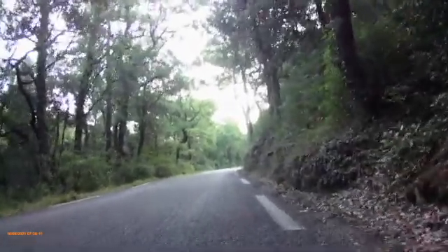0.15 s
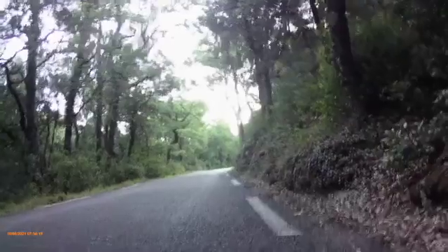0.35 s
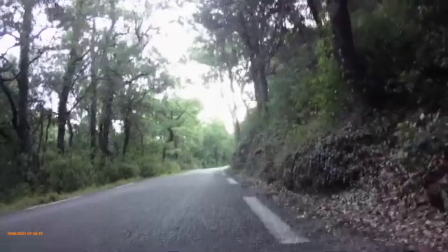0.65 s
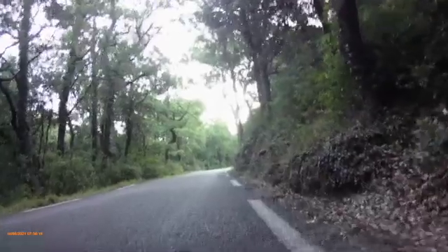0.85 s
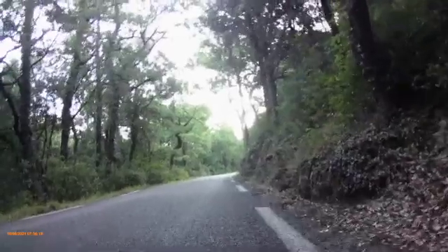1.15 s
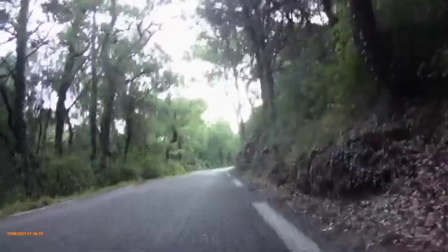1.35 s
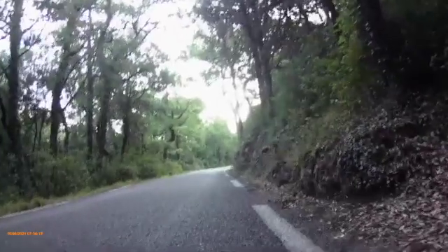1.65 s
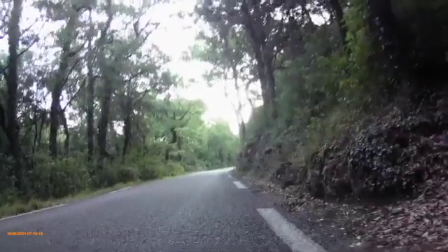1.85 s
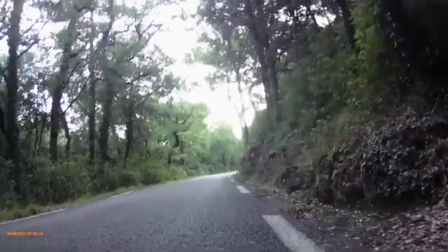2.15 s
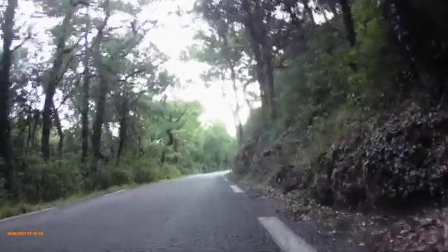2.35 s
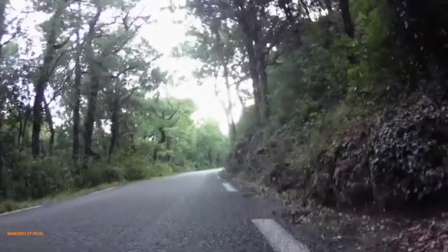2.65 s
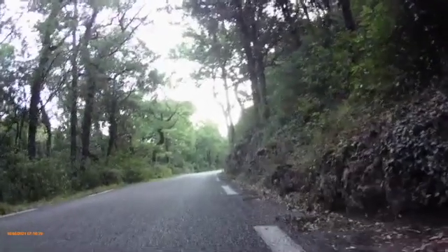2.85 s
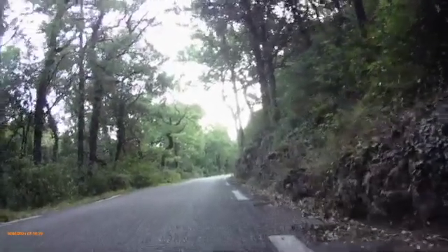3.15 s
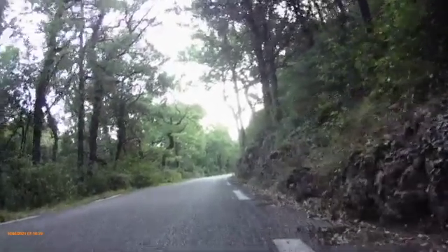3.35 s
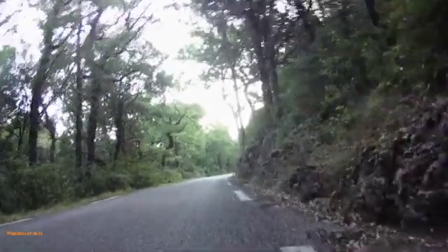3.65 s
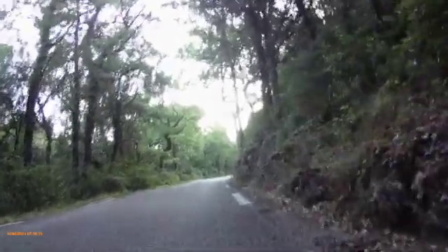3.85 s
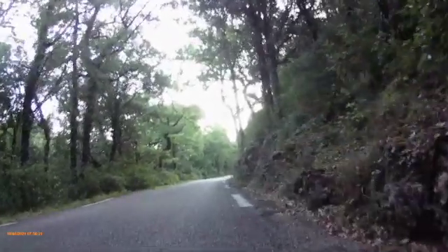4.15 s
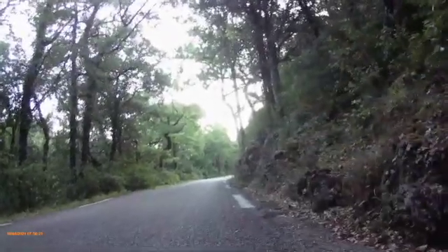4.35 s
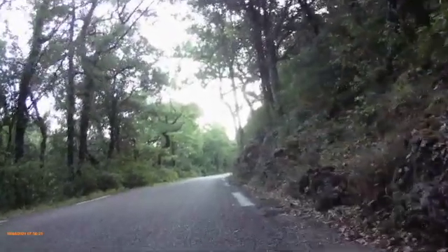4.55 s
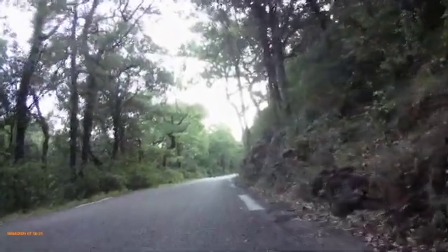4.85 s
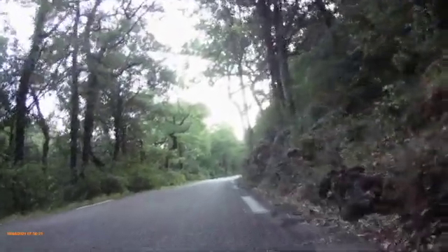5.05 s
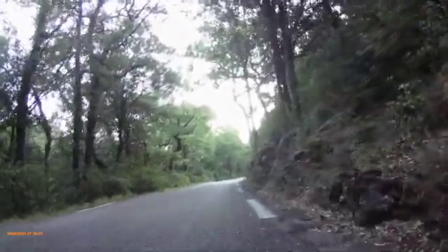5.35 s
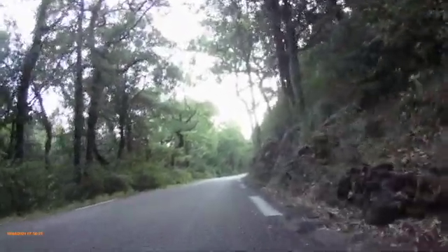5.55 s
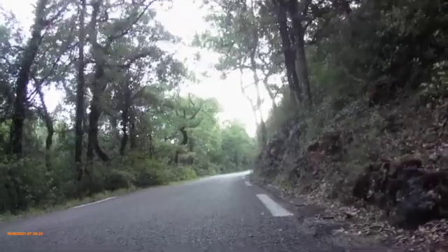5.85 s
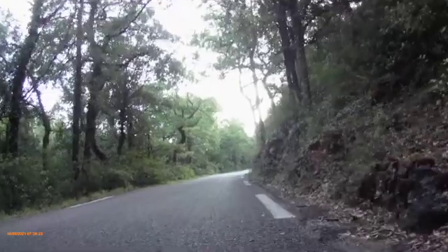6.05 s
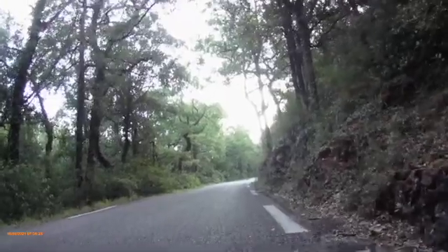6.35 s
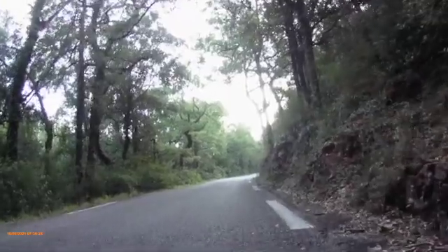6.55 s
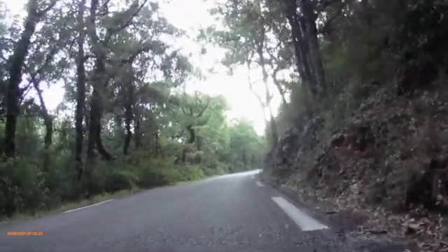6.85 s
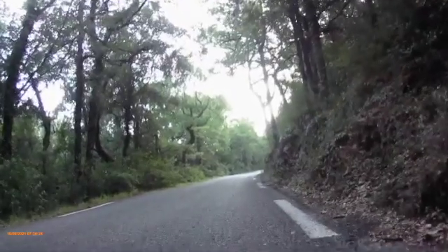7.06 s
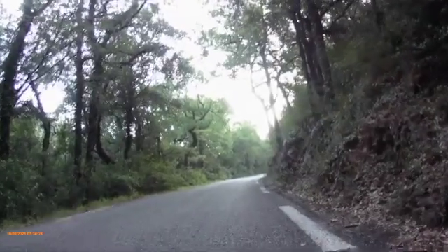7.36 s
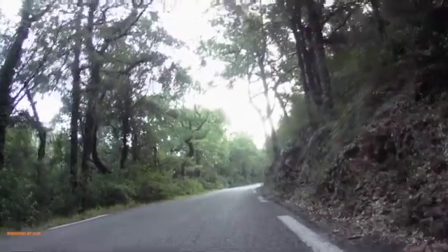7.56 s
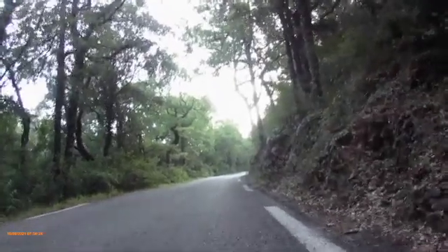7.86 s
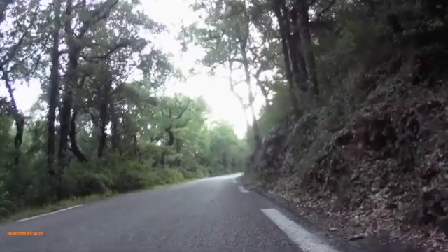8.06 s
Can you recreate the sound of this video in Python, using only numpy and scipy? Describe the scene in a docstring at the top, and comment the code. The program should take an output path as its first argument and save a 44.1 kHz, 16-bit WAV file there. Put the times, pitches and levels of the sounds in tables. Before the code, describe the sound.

A wheelchair rolls over rough asphalt, low tyre rumble under constant irregular hollow frame thuds and dry rattling knocks, with a faint insect pulsing behind.

```python
"""Wheelchair on rough asphalt

A wheelchair rolls along a rough road, heard from a microphone fixed to its frame.
Random grain excites banks of resonances for chair, tyres, fork, frame and loose fittings. Timed blows ring
the same resonances as ridge thumps, frame bumps and knocks. Small metal clinks, cracks and squeaks sit on top;
a high insect pulses steadily and filtered noise with a faint whistle makes the microphone amplifier's hiss."""
import sys
import numpy as np
from scipy import signal
from scipy.io import wavfile

SR = 44100
rng = np.random.default_rng(int(sys.argv[2]) if len(sys.argv) > 2 else 0)


def log_audio(samples):
    """Write samples as a 16-bit WAV file to the path given in sys.argv[1]."""
    # one column per channel
    frames = np.atleast_2d(samples).T
    # limit to full scale, then quantise
    limited = np.clip(frames, -1, 1)
    pcm = np.round(limited * 32767).astype(np.int16)
    wavfile.write(sys.argv[1], SR, pcm)


N = 361179

# ridges met by a tyre: start_s [s], level_db [dB]
RIDGES = [(0.214, -40), (0.397, -29.5), (0.531, -35), (0.733, -35), (0.879, -41), (1.012, -40),
          (1.218, -37), (1.296, -45), (1.44, -43), (1.646, -33), (1.793, -32), (1.848, -40), (1.997, -38),
          (2.177, -37.5), (2.26, -37), (2.339, -37), (2.459, -34), (2.59, -40), (2.738, -35), (2.786, -41),
          (3.039, -39.5), (3.182, -47), (3.263, -34), (3.376, -47), (3.513, -32.5), (3.577, -39),
          (3.649, -45), (3.789, -39), (3.941, -42), (4.042, -38), (4.436, -35), (4.534, -34), (4.653, -52),
          (4.737, -41), (4.816, -46), (4.945, -50), (5.156, -40), (5.41, -28.5), (5.593, -31), (5.673, -34),
          (5.929, -37), (6.057, -50), (6.559, -37), (6.699, -44), (6.826, -34), (6.992, -39), (7.1, -34),
          (7.243, -42), (7.661, -30), (7.739, -28), (8.021, -50)]
# blows felt by the frame tubes: start_s [s], level_db [dB], pitch_hz [Hz], hardness_db above the knee [dB]
FRAME_BLOWS = [(0.141, -36, 455, -7), (0.239, -35, 586, 9), (0.262, -36, 418, 5), (0.376, -23, 470, -3),
               (0.412, -12.5, 447, 15), (.428, -15, 445, 5), (0.442, -31, 480, 15), (0.453, -34.5, 447, -6),
               (0.577, -31.5, 464, -11), (0.676, -26.5, 433, -7), (0.716, -31, 422, 3),
               (0.739, -18, 437, -7), (0.774, -21.5, 535, 9), (0.818, -30, 453, 3), (0.995, -34.5, 460, 3),
               (1.192, -17, 490, -8), (1.208, -18, 500, 12), (1.234, -20.5, 417, -6), (1.305, -26, 444, -3),
               (1.383, -21, 440, 2), (1.435, -21, 490, -4), (1.477, -23.5, 383, 0), (1.553, -25, 564, 2),
               (1.578, -24, 450, 7), (1.662, -26, 483, -8), (1.744, -25.5, 580, 3), (1.809, -31, 450, -13),
                (1.994, -21, 480, -10), (2.037, -22, 452, -8), (2.318, -25.5, 443, 8),
               (2.352, -27.5, 433, 3), (2.392, -33, 396, 6), (2.411, -30, 430, -2), (2.438, -23.5, 480, 8),
                (2.627, -39, 415, 15), (2.669, -27.5, 450, -1), (2.762, -36, 433, 0),
               (3.263, -31, 490, 7.5), (3.352, -34, 560, -11),  (3.502, -22.5, 437, 12),
               (3.717, -35, 340, 10), (3.774, -34, 432, 1), (3.891, -32, 453, -12), (3.952, -41, 410, 5),
               (4.049, -37, 383, 2), (4.32, -37, 412, -6), (4.437, -29, 445, 0), (4.468, -31, 424, 6),
               (4.485, -23.5, 455, 11),  (4.589, -26, 530, -1), (4.619, -30.5, 377, 13.5),
               (4.779, -28, 474, 1), (4.817, -26, 407, -4), (5.001, -20.5, 444, -7), (5.017, -21, 454, 2),
               (5.108, -26.5, 445, -12), (5.155, -32, 457, 3),  (5.43, -28.5, 441, -9),
               (5.461, -22, 455, -18), (5.502, -29.5, 447, -10), (5.549, -27.5, 405, -4),
               (5.569, -24.5, 550, 0), (5.606, -27, 440, -3), (5.619, -15, 546, 2), (5.666, -17.5, 417, -4),
               (5.72, -27.5, 435, 0), (5.736, -23, 380, 3), (5.791, -25, 338, 2), (5.952, -23.5, 417, -7),
                (6.265, -27, 406, 8), (6.298, -27.5, 435, -12), (6.543, -35.5, 428, 2),
               (6.568, -21, 555, -13), (6.58, -19.5, 457, 4), (6.597, -26, 444, 1), (6.609, -15.5, 445, -2),
               (6.635, -29, 401, -9),  (6.757, -27.5, 430, 0.5), (6.797, -23, 415, 11),
               (6.826, -27, 464, 2),  (7.101, -40, 331, -5), (7.118, -22.5, 423, -3),
               (7.135, -28, 440, -14), (7.291, -26, 447, 5), (7.305, -24.5, 444, -3),
               (7.324, -21.5, 447, -6),  (7.635, -27, 480, 5), (7.661, -33, 387, 8), (7.675, -20.5, 446, 5),
               (7.702, -25, 523, 4.5), (7.805, -23, 342, 3), (7.826, -31, 453, -4), (7.859, -20.5, 418, -9)]
# loose fittings knocking: start_s [s], level_db [dB], pitch_hz [Hz], hardness_db above the knee [dB]
FITTING_BLOWS = [(0.021, -40.5, 1600, 12), (0.033, -38, 1530, -9), (0.183, -38.5, 1310, 1),
                 (0.228, -48, 1210, 9), (0.2402, -29, 1570, 7.5),  (0.2942, -38, 1210, 2),
                 (0.338, -43, 1820, 14), (0.357, -33.5, 1510, -2), (0.387, -30, 1290, 7),
                 (0.41, -20, 1150, 3), (0.518, -28.5, 990, -11), (0.718, -36, 1530, 6),
                 (0.7343, -22.5, 1310, 6.5), (0.752, -24, 1500, 1), (0.771, -30, 1340, 10),
                 (0.577, -45, 1800, 6), (0.819, -33.5, 1290, 6), (0.91, -40, 1540, -5),
                 (1.13, -28, 1600, 1), (1.182, -30, 1530, -2), (1.209, -19, 1250, 3),
                 (1.2383, -27.5, 1240, 6),  (1.306, -28.5, 1500, 0), (1.35, -31.5, 1110, 1),
                 (1.38, -31, 1780, -14), (1.395, -31, 1320, -18), (1.4185, -36, 1170, -15),
                 (1.4364, -29.5, 1320, 2), (1.471, -34.5, 1280, 12), (1.488, -31, 1610, -2),
                 (1.5117, -38, 1270, 2), (1.5517, -34.5, 1290, 8), (1.574, -28.5, 1550, 2),
                 (1.621, -39, 1290, 2),  (1.664, -34.5, 1280, -8), (1.7427, -38, 1500, -7),
                 (1.7546, -33.5, 1230, 10),  (1.81, -35, 1600, -10), (1.9505, -32, 1300, 4),
                 (1.995, -26, 1320, 6), (2.0148, -27, 1300, 1), (2.0407, -27.5, 1540, 3),
                 (2.0636, -32.5, 1520, -3), (2.27, -37, 1160, 2), (2.304, -42, 1320, 18),
                 (2.321, -28.5, 1520, 0), (2.357, -36, 1480, -5), (2.4373, -27, 1510, -10),
                 (2.4642, -31, 1530, -3), (2.5285, -38, 1550, 6), (2.5707, -36.5, 1300, 7),
                 (2.6393, -35, 1270, 5), (2.6702, -28, 1490, 5),  (2.8603, -32, 1440, -13),
                 (2.939, -35, 1430, 4),  (3.262, -41.5, 1590, 6), (3.5057, -29.5, 1430, -9),
                 (3.5553, -28.5, 1280, -4), (3.599, -41, 1280, -14), (3.643, -38, 1270, 0),
                 (3.653, -33, 1610, -3), (3.701, -32, 1230, -1), (3.773, -37, 1280, 9),
                  (3.8407, -38, 1300, 0), (3.89, -29, 1320, -16), (3.9782, -34.5, 1550, -3),
                  (4.2036, -37.5, 1210, 17), (4.4355, -34.5, 1320, 4), (4.4657, -36.5, 1240, 5),
                 (4.4847, -27, 1500, 3.5), (4.6346, -37, 1310, 9), (4.778, -29.5, 1340, 4.5),
                 (4.831, -32.5, 1250, 7), (4.878, -45, 2100, 12), (4.911, -47, 2000, 13),
                 (4.9766, -31.5, 1270, 4.5), (4.9996, -20.5, 1480, 5.5), (5.0228, -31.5, 1320, 9.5),
                  (5.1065, -29, 1240, 9.5), (5.465, -30.5, 1300, 5), (5.5, -32.5, 1320, 6),
                 (5.5476, -31.5, 1280, 4), (5.5682, -25.5, 1280, 5.5), (5.6066, -22, 1540, 4),
                 (5.619, -25, 1300, -4), (5.63, -34, 1540, -4), (5.6632, -20.5, 1310, 7),
                 (5.69, -30, 1280, 6), (5.72, -30, 1300, 7), (5.735, -30.5, 1290, 9),
                 (5.9507, -29, 1290, 7.5), (5.9755, -35, 1540, 2),  (6.2665, -31.5, 1500, -1),
                 (6.2973, -29, 1520, 3), (6.322, -38, 1270, 5), (6.339, -36, 1240, 1),
                 (6.409, -39.5, 1220, 2), (6.5592, -27, 1600, 6.5), (6.5815, -25.5, 1280, -3),
                 (6.6102, -23.5, 1480, 5.5),  (6.7109, -36, 1510, 0), (6.7557, -34.5, 1290, 8),
                 (6.7927, -25, 1500, -3), (6.8232, -29, 1280, 3.5), (6.8414, -28, 1280, -3),
                 (6.8653, -37, 1210, -7), (6.9028, -33, 1290, 4.5), (7.118, -29, 1520, 7),
                 (7.151, -37.5, 1230, -7), (7.22, -41, 1600, 6), (7.2887, -33.5, 1290, 9.5),
                 (7.305, -26, 1500, 0), (7.3242, -25.5, 1470, 4.5), (7.5053, -37, 1560, -6),
                 (7.546, -39.5, 1560, 5), (7.633, -35, 1500, 7),  (7.675, -36, 1510, 0),
                 (7.7049, -23, 1510, -8), (7.7583, -32, 1310, 7), (7.787, -43, 1040, 0),
                 (7.8173, -33, 1470, -3), (7.853, -25.5, 1330, -1), (7.8727, -31.5, 1560, 4),
                 (7.896, -37, 1520, -2),  (7.9627, -32, 1550, 0), (8.1498, -44, 1310, 12)]
# metal clinks: start_s [s], level_db of the upper modes [dB], then level_db of each of the five lowest modes [dB]
CLINK_BLOWS = [(0.3356, -40.5, -62, -48, -57.5, -65, -51), (0.369, -69, -63, -72, -79, -78, -81),
               (0.748, -43.5, -71, -53, -52.5, -59, -62), (2.6448, -44, -55, -48, -57, -65, -52),
               (2.8594, -46, -69, -51, -52.5, -65, -65), (2.9388, -47, -61, -56, -58, -67, -63),
               (7.7864, -46, -59, -53, -58, -63, -58)]
# resonances of the tyres: mode_hz [Hz], width_hz [Hz], level_db [dB]
TYRE_MODES = [(84.4, 20, -13), (95.8, 14.7, 8.5), (115, 106, -10)]
# resonances of the frame tubes, before blows scale the widths: mode_hz [Hz], width_hz [Hz], level_db [dB]
FRAME_MODES = [(305.3, 12, -29), (372, 36, -9.5), (384.8, 57, -4.5), (442.3, 51, -2.16), (490.6, 28.6, -8),
               (549.3, 51, -5.5), (653, 40, -13.5), (715, 36, -12), (791, 22, -22.5), (875, 70, -27)]
# resonances of the loose fittings, before blows scale the widths: mode_hz [Hz], width_hz [Hz], level_db [dB]
FITTING_MODES = [(933, 46, -14), (983, 50, -15.5), (1118, 170, -7.5), (1279.6, 78, -4.5), (1540, 58, -5.5),
                 (1713, 113, -12), (1837, 112, -12), (1966, 167, -16), (2142, 98, -21), (2416, 150, -25.5),
                 (2635, 69, -29.5), (3430, 900, -36.5)]


def amp(db):
    """Decibels to gain."""
    return 10 ** (np.asarray(db) / 20)


def rms_one(x):
    """Scale to unit rms."""
    return x / np.sqrt(np.mean(x ** 2) + 1e-20)


def clicks(times, gains):
    """A train of single-sample blows."""
    train = np.zeros(N)
    index = np.minimum((np.asarray(times) * SR).astype(int), N - 1)
    np.add.at(train, index, gains)
    return train


def ring(drive, hz, width_hz):
    """One damped mode; a unit click starts a sine of height 1, and a wider mode dies sooner."""
    radius = np.exp(-np.pi * width_hz / SR)
    angle = 2 * np.pi * hz / SR
    return signal.lfilter([0, np.sin(angle)], [1, -2 * radius * np.cos(angle), radius ** 2], drive + 1e-18)


def swell(drive, hz, width_hz, rise_s):
    """Two resonators in series, so the ring builds up over rise_s; the second has gain 1 at its peak."""
    rise_hz = 1 / (np.pi * rise_s)
    return ring(ring(drive, hz, width_hz), hz, rise_hz) * 2 * np.pi * rise_hz / SR


def drift(per_s):
    """Slow random curve of unit rms: noise through two equal low-pass poles."""
    pole = np.exp(-2 * np.pi * per_s / SR)
    settled = signal.lfilter([1], [1, -2 * pole, pole ** 2], rng.standard_normal(N + SR))[SR:]
    return rms_one(settled)


def stirred(base_db, blows, uneven_db, per_s):
    """A wavering base level in dB; added power builds up towards each blow and dies away after it."""
    total = amp(2 * (base_db + uneven_db * drift(per_s)))
    for rows, (offset_db, rise_s, decay_s) in blows:
        start_s, level_db = np.transpose(rows)[:2]
        power = clicks(start_s, amp(2 * (level_db + offset_db))) + 1e-18
        total = total + signal.lfilter([1], [1, -np.exp(-2 / (decay_s * SR))], power)
        # run backwards in time, the same decay becomes the rise
        total = total + signal.lfilter([0, 1], [1, -np.exp(-2 / (rise_s * SR))], power[::-1])[::-1]
    return 10 * np.log10(total)


def shaken(level_db, modes, stones_per_s, spread_db, grain, skirt):
    """Sparse stones of uneven size and fine grain drive every mode; skirt widens each mode's second pass."""
    sizes = amp(spread_db * np.minimum(rng.exponential(1, N), 3)) * rng.choice([-1, 1], N)
    stones = rms_one(sizes * (rng.random(N) < stones_per_s / SR))
    # two drives share the stones but not the grain; neighbouring modes alternate between them
    drive = amp(level_db) * (stones + grain * rng.standard_normal((2, N)))
    out = np.zeros(N)
    for k, (hz, width_hz, db) in enumerate(modes):
        rise_s = 1 / (np.pi * skirt * width_hz)
        out += (-1) ** k * amp(db) * width_hz * swell(drive[k % 2], hz, width_hz, rise_s)
    return rms_one(out) * np.sqrt(np.mean(amp(level_db) ** 2))


def struck(blows, modes, knee_hz, focus_db, scatter_db, damping, rise_s, bounce_s, bounce, group):
    """Each blow favours modes near its pitch and bounces once; polarity flips from group to group of modes."""
    start_s, level_db, pitch_hz, hardness_db = np.transpose(blows)
    chance = rng.standard_normal((len(start_s), len(modes) + 1))
    bounce_at_s = start_s + bounce_s * np.exp(0.4005 * chance[:, -1])
    out = np.zeros(N)
    for k, (hz, width_hz, db) in enumerate(modes):
        octaves_off = np.minimum(np.abs(np.log2(hz / pitch_hz)), .6)
        colour_db = -focus_db * octaves_off + hardness_db * (hz > knee_hz)
        gains = (-1) ** (k // group) * amp(level_db + db + colour_db + scatter_db * chance[:, k])
        drive = clicks(start_s, gains) + clicks(bounce_at_s, bounce * gains)
        out += swell(drive, hz, damping * width_hz, rise_s)
    return out


def amplifier():
    """Microphone amplifier: nearly flat noise, and a whistle made of noise through a narrow resonance."""
    hiss = rms_one(signal.lfilter([1], [1, -0.23], rng.standard_normal(N)))  # slight tilt to the lows
    whistle = rms_one(swell(rng.standard_normal(N), 11585, width_hz=25, rise_s=.01))
    return amp(-66) * hiss + amp(-89) * whistle


def insect(level_db, uneven_db, width_hz):
    """Regular clicks of uneven strength ring one high resonance as short pulses."""
    first_s, pulses_per_s, pitch_hz = .024, 21.97, 5450
    start_s = np.arange(first_s, N / SR, 1 / pulses_per_s)
    gains = amp(level_db + uneven_db * rng.standard_normal(len(start_s)))
    return swell(clicks(start_s, gains), pitch_hz, width_hz, rise_s=0.0029)


def squeaks(width_hz):
    """Rubbing noise through a narrow resonance, shaped by a rounded stroke."""
    # brief squeaks: start_s [s], length_s [s], pitch_hz [Hz], level_db before the stroke [dB]
    squeak_rows = [(1.369, 0.015, 1760, -40), (1.892, .025, 1836, -51.5), (2.949, .02, 1750, -55),
                   (3.713, 0.066, 1820, -52.5), (4.21, 0.052, 1267, -47), (4.243, 0.024, 1880, -55),
                   (5.303, .025, 1800, -55)]
    t = np.arange(N) / SR
    rub = rng.standard_normal(N)
    out = np.zeros(N)
    for start_s, length_s, pitch_hz, level_db in squeak_rows:
        stroke = np.sin(np.pi * np.clip((t - start_s) / length_s, 0, 1))
        out += amp(level_db) * stroke * rms_one(swell(rub, pitch_hz, width_hz, rise_s=0.0019))
    return out


def cracks(width_hz, rise_s):
    """Some moments crack sharply: two short broad rings, each struck twice in quick succession."""
    # cracks: start_s [s], upper_level_db [dB], lower_level_db [dB]
    crack_rows = [(0.414, -49, -51.5), (0.4379, -50.5, -60), (1.2156, -41, -52.5), (4.8787, -56.5, -49),
                  (5.568, -52, -59.5), (5.6047, -56, -57), (5.6635, -55, -57), (6.562, -42.5, -52),
                  (6.6104, -51, -57.5), (6.8249, -52, -60.5), (6.8424, -54.5, -65), (7.6934, -57.5, -49)]
    # the two rings, upper then lower: pitch_hz [Hz]
    crack_pitches = 4460, 3370
    start_s, *levels_db = np.transpose(crack_rows)
    out = np.zeros(N)
    for hz, level_db in zip(crack_pitches, levels_db):
        drive = clicks(start_s, amp(level_db)) + clicks(start_s + 0.0019, amp(level_db - 3.5))
        out += swell(drive, hz, width_hz, rise_s)
    return out


def snaps(low_hz, high_hz):
    """A broad snap at each clink: fast-decaying noise through a band-pass."""
    start_s, level_db = np.transpose(CLINK_BLOWS)[:2]
    offset_db, decay_s = -6, 0.0027
    train = clicks(start_s, amp(level_db + offset_db)) + 1e-18
    envelope = signal.lfilter([1], [1, -np.exp(-1 / (decay_s * SR))], train)
    band = signal.butter(2, [low_hz, high_hz], "band", fs=SR, output="sos")
    return signal.sosfilt(band, envelope * rng.standard_normal(N))


def clinks():
    """A small metal part struck twice: five low modes have their own levels, the upper ones share one."""
    # modes of the part: mode_hz [Hz], level_db [dB], t60_s [s], rise_s [s]
    metal_modes = [(2477, 8.5, 0.16, 0.00081), (3168, 8, 0.036, 0.0041), (4197, 7.5, 0.07, 0.001),
                   (4540, 8, 0.066, .002), (4706, 11, 0.016, 0.0009), (5550, 1.5, 0.011, 0.00037),
                   (5850, -9, 0.028, 0.00065), (6675, -10, 0.04, 0.00051)]
    start_s, upper_db, *own_db = np.transpose(CLINK_BLOWS)
    chance_db = rng.standard_normal((len(start_s), len(metal_modes)))
    out = np.zeros(N)
    for k, (hz, db, t60_s, rise_s) in enumerate(metal_modes):
        blow_db = own_db[k] if k < len(own_db) else upper_db + chance_db[:, k]
        gains = amp(db + blow_db)
        drive = clicks(start_s, gains) + clicks(start_s + .004, .5 * gains)
        width_hz = np.log(1000) / np.pi / t60_s
        out += swell(drive, hz, width_hz, rise_s)
    return out


def road():
    """Slowly changing base levels of tyres, frame and fittings, interpolated to every sample."""
    # road surface: time_s [s], tyres_db [dB], frame_db [dB], fittings_db [dB]
    road_rows = [(0.0, -47, -47.5, -59.5), (0.57, -48, -44, -56), (1.12, -52, -47, -56),
                 (1.43, -42.5, -40, -60), (2.03, -52.5, -46.5, -57.5), (2.6, -45.5, -44, -56.5),
                 (3.13, -51.5, -49, -58), (3.74, -43.5, -42, -55), (4.1, -53, -47, -55.5),
                 (4.72, -42, -43.5, -55.5), (5.29, -50, -46.5, -55.5), (5.63, -50, -53, -55),
                 (5.95, -45.5, -47.5, -60.5), (6.55, -52, -50, -57), (6.68, -50, -41.5, -58),
                 (7.46, -52.5, -50.5, -57), (7.82, -47, -39, -66.5), (8.19, -44, -49.5, -53)]
    time_s, *levels_db = np.transpose(road_rows)
    return [np.interp(np.arange(N) / SR, time_s, level_db) for level_db in levels_db]


def lulls():
    """Rounded dips in the rolling level, as when the wheels are unloaded, as a dB curve."""
    # lulls: centre_s [s], length_s [s], depth_db [dB], negative for a lift
    lull_rows = [(0.168, 0.065, 4), (0.475, 0.043, 4.5), (0.6, 0.044, 2.5), (0.96, 0.055, 3.5),
                 (1.116, 0.043, 8), (1.16, 0.03, 9), (1.28, 0.036, 3), (1.915, .07, 4), (2.116, 0.1, 4.5),
                 (2.39, 0.052, 2), (3.203, 0.11, 2.5), (4.012, .05, 1), (4.103, 0.032, 2),
                 (4.715, 0.065, 5), (5.069, 0.054, 10), (5.373, 0.081, 7), (5.535, 0.036, 2),
                 (5.796, .05, 3), (6.11, .06, 2), (6.49, 0.11, 3), (7.05, .06, 2), (7.406, .08, -4),
                 (8.014, 0.076, 4)]
    t = np.arange(N) / SR
    out_db = np.zeros(N)
    for centre_s, length_s, depth_db in lull_rows:
        out_db -= depth_db * np.cos(np.pi * np.clip((t - centre_s) / length_s, -.5, .5)) ** 2
    return out_db


def chair_bounce():
    """The whole chair bounces on its tyres: one very low mode, swelling around each lurch."""
    # lurches: start_s [s], level_db [dB]
    lurch_rows = [(0.272, -49), (0.671, -44), (1.024, -47), (1.21, -40), (1.57, -42), (2.272, -63),
                  (3.555, -61), (3.794, -41), (4.248, -58), (4.591, -50), (4.871, -44), (5.432, -45),
                  (5.933, -51.5), (6.585, -48), (6.902, -39), (7.197, -49), (7.449, -50), (7.656, -41)]
    # shaking around a lurch: offset_db [dB], rise_s [s], decay_s [s]
    lurch_shake = (-2, 0.047, 0.071)
    # resonance of the chair: mode_hz [Hz], width_hz [Hz], level_db [dB]
    chair_modes = [(32, 13, 0)]
    level_db = stirred(-54.5, [(lurch_rows, lurch_shake)], uneven_db=0.5, per_s=3.3)
    return shaken(level_db, chair_modes, stones_per_s=70, spread_db=8.0, grain=3.0, skirt=2.6)


def fork_shaking(tyres_db, frame_db, lull_db):
    """The fork takes its level from tyres and frame together and answers the bumps."""
    # shaking around a bump: offset_db [dB], rise_s [s], decay_s [s]
    fork_shake = (-22, 0.02, 0.051)
    # resonances of the fork: mode_hz [Hz], width_hz [Hz], level_db [dB]
    fork_modes = [(139.6, 52, -22), (170.9, 36.6, 1.5), (202, 59, -10), (262, 65, -10.5)]
    base_db = 0.49 * tyres_db + 0.57 * frame_db - 7
    level_db = stirred(base_db, [(FRAME_BLOWS, fork_shake)], uneven_db=1.5, per_s=11.0)
    return shaken(level_db + lull_db, fork_modes, stones_per_s=86, spread_db=1.0, grain=1.96, skirt=2.35)


def tyre_rumble(tyres_db, lull_db):
    """Road grain shakes the low tyre modes, harder around each ridge."""
    # shaking around a ridge: offset_db [dB], rise_s [s], decay_s [s]
    thump_shake = (-11.5, 0.03, 0.033)
    level_db = stirred(tyres_db, [(RIDGES, thump_shake)], uneven_db=2.5, per_s=23.0)
    return shaken(level_db + lull_db, TYRE_MODES, stones_per_s=69, spread_db=3.0, grain=1.8, skirt=3.4)


def thumps(offset_db, rise_s):
    """Each ridge also rings the main tyre mode once, with random polarity."""
    start_s, level_db = np.transpose(RIDGES)
    hz, width_hz, _ = TYRE_MODES[1]
    gains = amp(level_db + offset_db) * rng.choice([-1, 1], len(start_s))
    return swell(clicks(start_s, gains), hz, width_hz, rise_s)


def frame_shaking(frame_db, lull_db):
    """Road grain shakes the frame tubes, harder around each bump."""
    # shaking around a bump: offset_db [dB], rise_s [s], decay_s [s]
    bump_shake = (-18, 0.022, 0.03)
    level_db = stirred(frame_db, [(FRAME_BLOWS, bump_shake)], uneven_db=2.0, per_s=5.5)
    return shaken(level_db + lull_db, FRAME_MODES, stones_per_s=150, spread_db=0.5, grain=1.17, skirt=3.6)


def fittings_rattle(fittings_db, lull_db):
    """Road grain shakes the loose fittings; knocks stir them and gritty patches set them scuffing."""
    # gritty patches: start_s [s], level_db [dB]
    scuff_rows = [(0.01, -46.5), (0.3, -50), (1.46, -49), (2.4, -47.5), (3.28, -48), (3.56, -52),
                  (3.7, -60), (4.13, -56), (4.22, -56), (4.29, -68), (4.56, -47), (4.66, -46), (4.88, -59),
                  (5.22, -54), (5.42, -51), (6.14, -51), (6.36, -47), (6.69, -47), (6.94, -63), (7.09, -73),
                  (7.66, -46), (7.8, -43)]
    # shaking around a knock, then around a scuff: offset_db [dB], rise_s [s], decay_s [s]
    knock_shake = (-22.5, 0.014, 0.03)
    scuff_shake = (-2.3, 0.034, 0.034)
    blows = [(FITTING_BLOWS, knock_shake), (scuff_rows, scuff_shake)]
    level_db = stirred(fittings_db, blows, uneven_db=4.0, per_s=5.8)
    return shaken(level_db + lull_db, FITTING_MODES, stones_per_s=180, spread_db=2.0, grain=1.0, skirt=4.7)


def ticks(offset_db, hz, width_hz):
    """The first touch of a knock is a dry tick, louder the harder the knock."""
    start_s, level_db, _, hardness_db = np.transpose(FITTING_BLOWS)
    gains = amp(level_db + hardness_db + offset_db)
    return swell(clicks(start_s, gains), hz, width_hz, rise_s=0.00018)


def knocks():
    """Fittings struck with a quick bounce and a tick; the soft contact hardly rings above the low-pass."""
    rings = struck(FITTING_BLOWS, FITTING_MODES, knee_hz=1750, focus_db=9.0, scatter_db=3.0, damping=0.93,
                   rise_s=0.00018, bounce_s=0.002987, bounce=0.41, group=1)
    touches = ticks(offset_db=-15, hz=2190, width_hz=710)
    contact = signal.butter(6, 2940, fs=SR, output="sos")
    return signal.sosfilt(contact, rings + touches)


def bumps():
    """Bumps thud through the frame tubes; hard ones reach the modes above the knee."""
    return struck(FRAME_BLOWS, FRAME_MODES, knee_hz=600, focus_db=22.5, scatter_db=3.5, damping=0.86,
                  rise_s=0.0026, bounce_s=0.008046, bounce=0.48, group=2)


def scene():
    """Hiss, insect and small metal sounds under the rolling chair and its blows."""
    background = amplifier() + insect(level_db=-66.0, uneven_db=2.5, width_hz=98)
    small = squeaks(width_hz=93) + cracks(width_hz=390, rise_s=0.00033)
    small = small + snaps(low_hz=1500, high_hz=7500) + clinks()
    tyres_db, frame_db, fittings_db = road()
    lull_db = lulls()
    low = chair_bounce() + tyre_rumble(tyres_db, lull_db) + thumps(offset_db=1.0, rise_s=0.0062)
    # between the bounce and the tyres little reaches the microphone
    low = signal.lfilter(*signal.iirnotch(52.7, 1.6, fs=SR), low)
    fork = fork_shaking(tyres_db, frame_db, lull_db)
    frame = frame_shaking(frame_db, lull_db)
    fittings = fittings_rattle(fittings_db, lull_db)
    rolling = low + fork + frame + fittings
    return (background + small + rolling + knocks() + bumps())[None]


def record(dry):
    """The top is cut steeply, 45 dB down from 12850 Hz upwards."""
    return signal.sosfilt(signal.cheby2(16, 45, 12850, fs=SR, output="sos"), dry)


dry = scene()
out = record(dry)
log_audio(out)
```